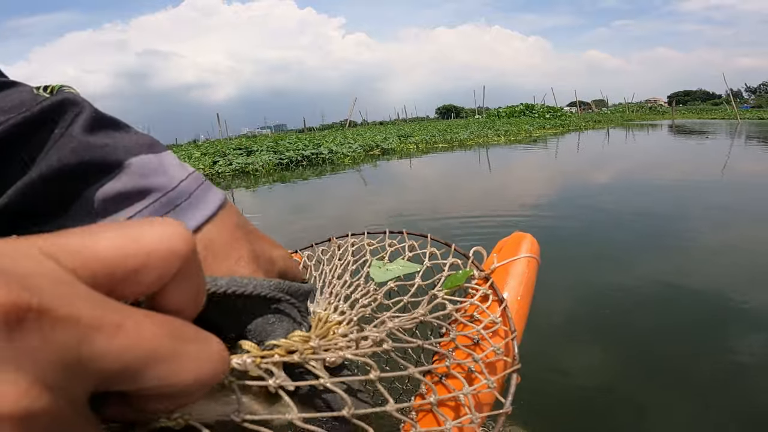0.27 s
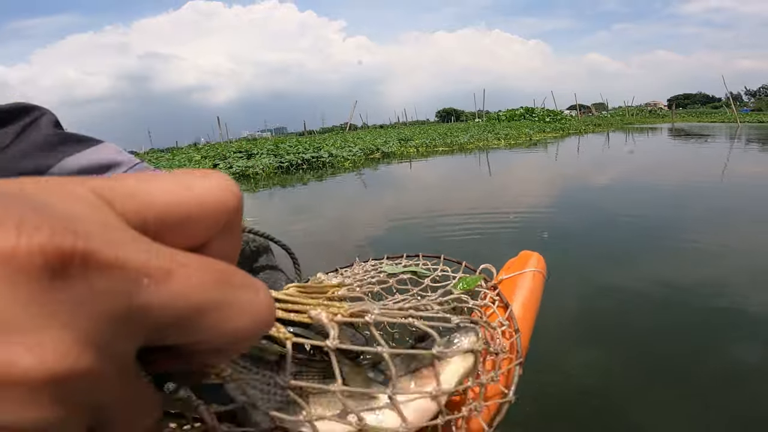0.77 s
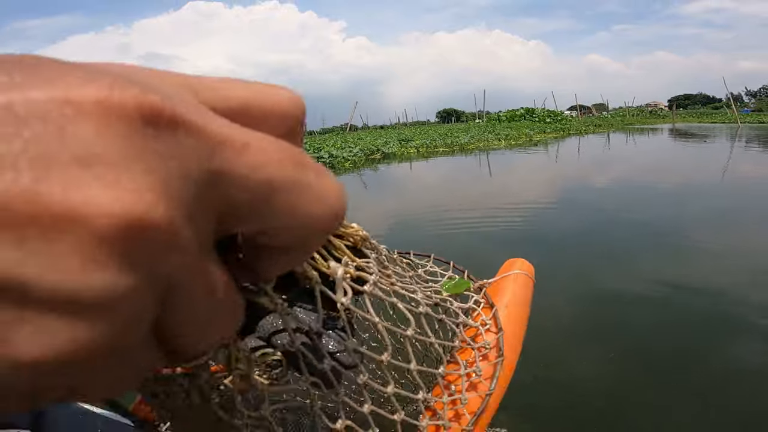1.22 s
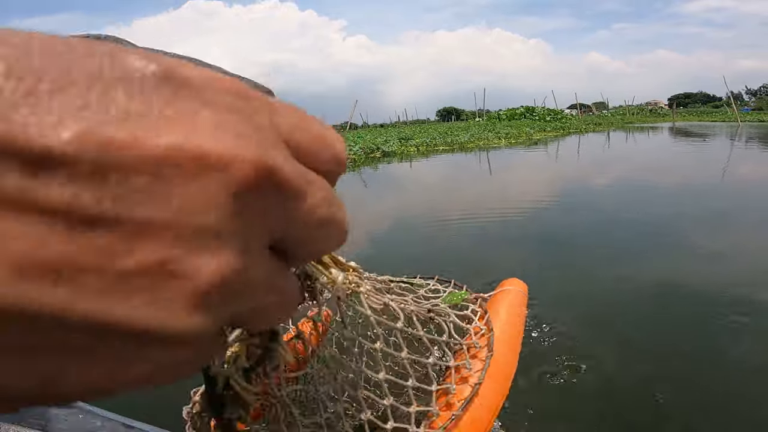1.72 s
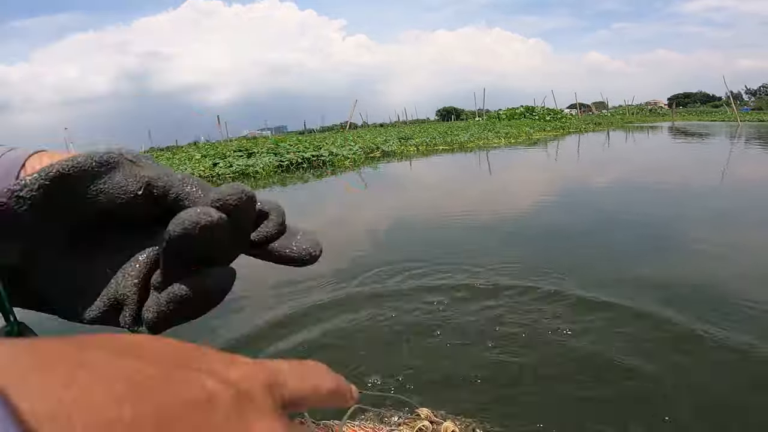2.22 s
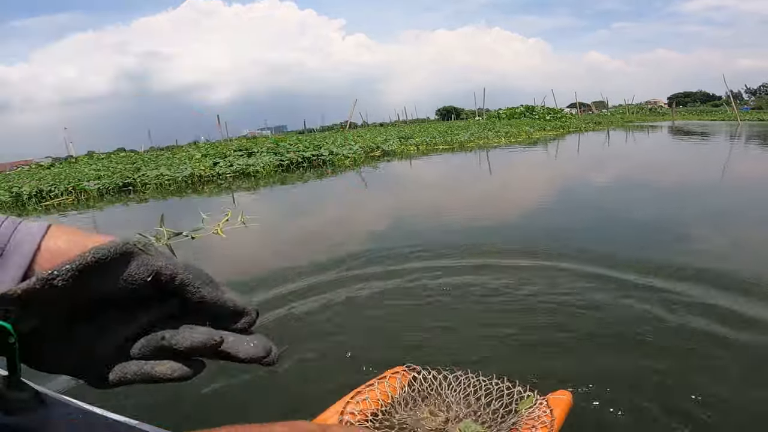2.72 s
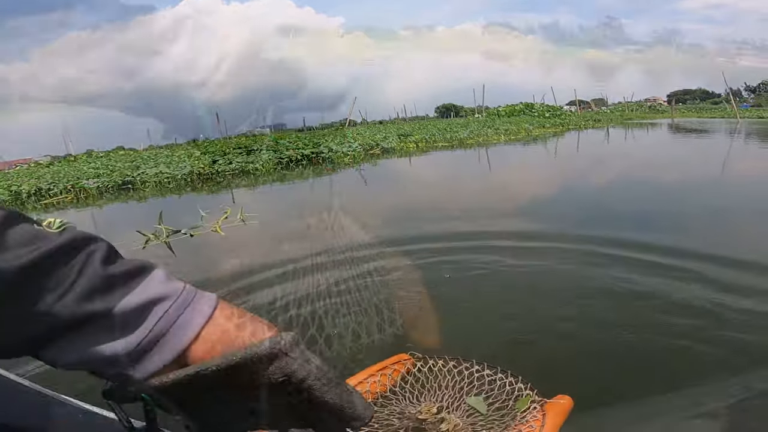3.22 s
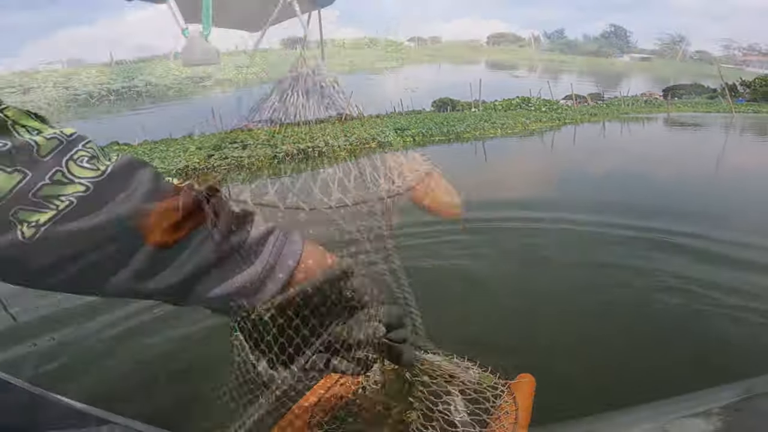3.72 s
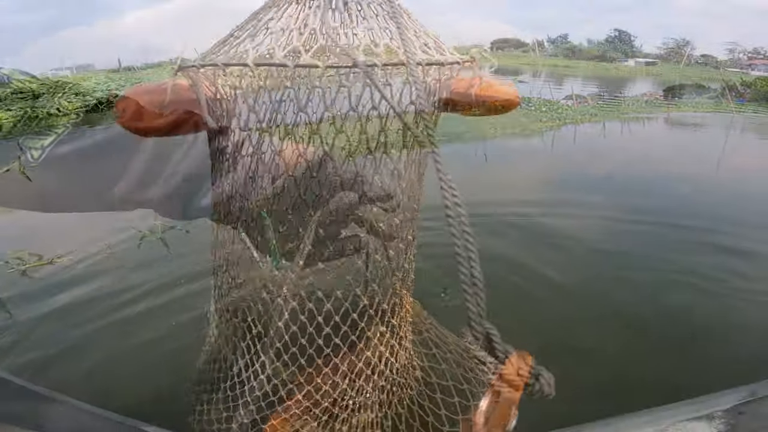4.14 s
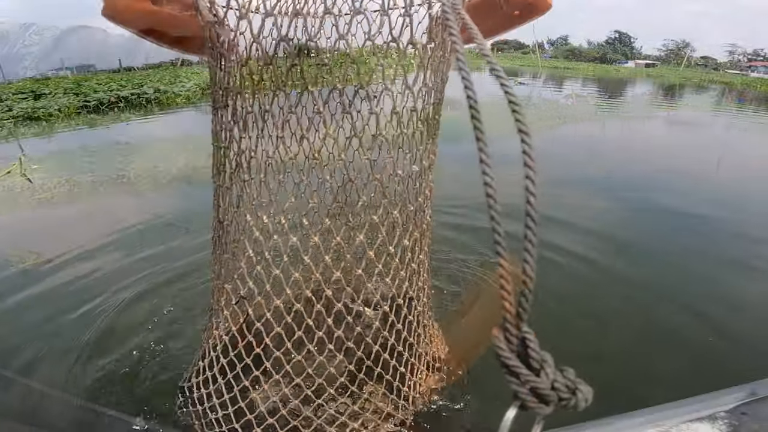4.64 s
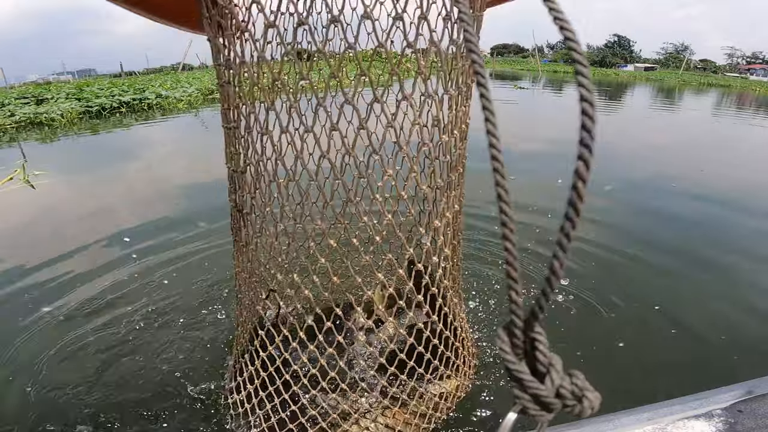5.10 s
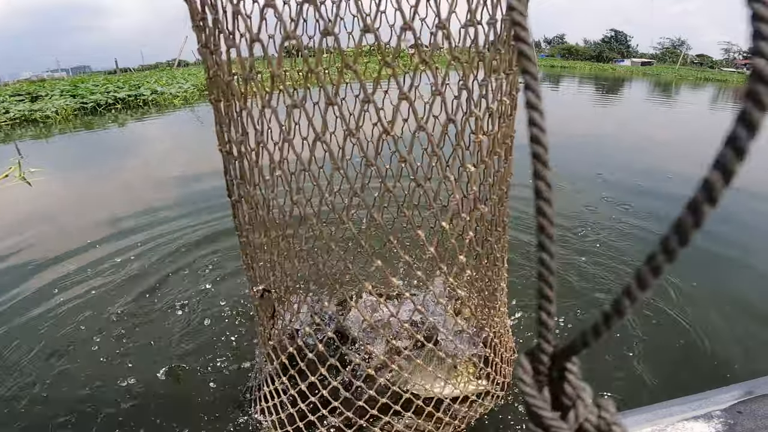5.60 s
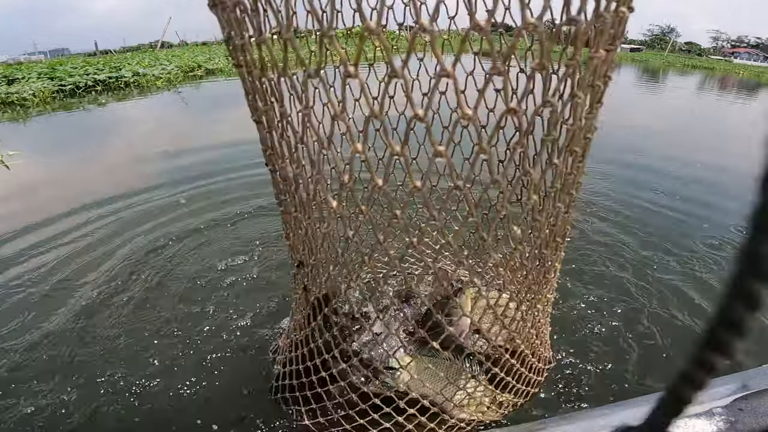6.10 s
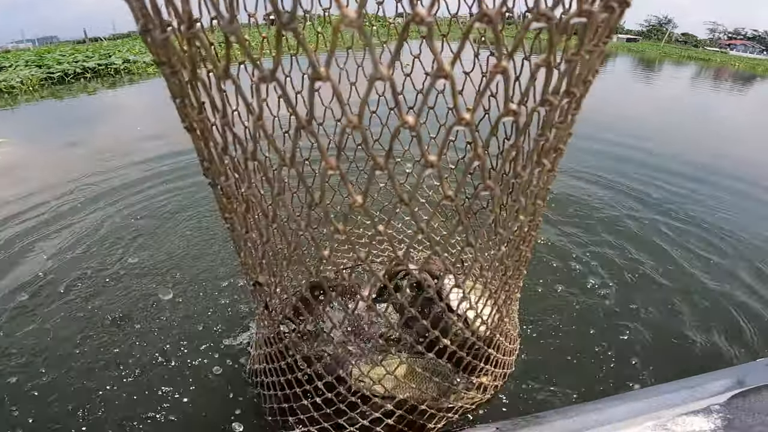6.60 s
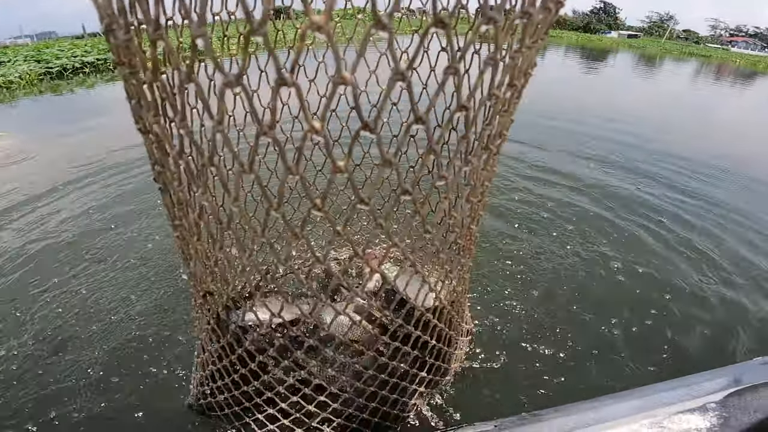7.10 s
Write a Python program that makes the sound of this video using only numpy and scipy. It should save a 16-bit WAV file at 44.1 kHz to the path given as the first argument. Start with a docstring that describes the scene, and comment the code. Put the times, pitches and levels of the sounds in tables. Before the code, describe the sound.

Wind buffets a close stereo microphone on a lake while someone handles a wet keep-net: cord rubs and snaps, hollow floats knock and drops plop. A steady, faraway engine hum joins in, and a small metal clip ticks a few times. Then water pours from the raised net and the fish in it splash and gurgle in repeated bursts, louder than everything before.

```python
"""On a small boat, close to a mesh keep-net, with a stereo microphone whose two ports sit side by side.
Wet cord rustles and snaps in the hands, floats knock, a metal clip ticks and drops plop.
Then the net is lifted and fish thrash in it: water splashes in surges of bubbles and fizz.
A breeze rumbles on the microphone; a low drone, as of a distant engine, sets in and settles in pitch."""
import sys
import numpy as np
from scipy import signal
from scipy.fft import rfft, irfft, next_fast_len
from scipy.io import wavfile
from scipy.ndimage import map_coordinates

SR = 44100
rng = np.random.default_rng(int(sys.argv[2]) if len(sys.argv) > 2 else 0)


def store_wav(level_fs):
    """Save 16-bit WAV to argv[1]."""
    pcm = np.round(np.clip(np.atleast_2d(level_fs), -1, 1) * 32767)
    wavfile.write(sys.argv[1], SR, pcm.T.astype(np.int16))


N = 324395

# spectrum of the deepest wind rumble: f/Hz, level/dB
RUMBLE_SPECTRUM = [(18, -8), (28, -1.5), (80, -3), (140, -13), (200, -120)]
# spectrum of wet cord rubbing: f/Hz, level/dB
CORD_SPECTRUM = [(300, -37.5), (600, 0), (1000, -14.5), (1700, -13.5), (3000, -12), (4700, -13),
                 (7400, -16), (10000, -31.5), (12500, -28.5), (15600, -38)]
# spectrum of thrown spray: f/Hz, level/dB
SPRAY_SPECTRUM = [(290, -33), (500, -10), (759, -7.5), (815, -12), (1100, 10), (1960, -6.5), (4200, -16.5),
                  (6470, -18), (10100, -33.5), (12400, -34.5), (15600, -52)]
GRIP_DB_PER_S, SLACK_DB_PER_S = 506, 402.5  # a stroke over the mesh swells and dies


def amp(db):
    """Gain of a level in dB."""
    return 10 ** (np.asarray(db) / 20)


def unit(x):
    """x at rms 1."""
    return x / np.sqrt(np.mean(x ** 2) + 1e-20)


def along(points, hz):
    """Value at hz between (Hz, value) points on a log axis."""
    f, v = np.transpose(points)
    return np.interp(np.log(hz + 1), np.log(f + 1), v)


def curves(rows):
    """One value per sample for each column after the time."""
    s, *cols = np.transpose(rows)
    return [np.interp(np.arange(N) / SR, s, c) for c in cols]


def wobble(rate):
    """A smooth random curve, rate knots a second."""
    return map_coordinates(rng.standard_normal(int(N * rate / SR) + 4), [np.arange(N) * rate / SR])


def held(start, hold, db, rise, fall):
    """Level in dB of a sound that swells at rise dB/s, holds from start, and dies at fall dB/s."""
    t = np.arange(N) / SR
    return db - rise * np.maximum(start - t, 0) - fall * np.maximum(t - start - hold, 0)


def together(levels_db):
    """Level in dB of sounds whose powers add."""
    return 10 * np.log10(sum(amp(2 * db) for db in levels_db) + 1e-14)


def filtered(x, response):
    """x through a frequency response."""
    m = next_fast_len(N + 8192)
    return irfft(rfft(x, m) * response(np.fft.rfftfreq(m, 1 / SR)), m)[..., :N]


def noise(spectrum, spiky_db=0, rate=300):
    """Coloured noise of rms 1; spiky_db clumps it into grains, rate a second."""
    white = rng.standard_normal(N) * amp(spiky_db * wobble(rate))
    return unit(filtered(white, lambda hz: amp(along(spectrum, hz))))


def split(x, hz, low_db, high_db):
    """The parts of x below and above hz, each at its own level."""
    low = filtered(x, lambda f: 1 / (1 + (f / hz) ** 4))
    return amp(low_db) * unit(low) + amp(high_db) * unit(x - low)


def bubbles(s, db, hz, cycles, rise, size=SR // 20):
    """Damped sines at times s; with rise > 0 the pitch climbs as the bubble nears the surface."""
    turns = hz[:, None] * (np.arange(size) / SR)
    age = turns / cycles[:, None]
    shape = (1 - np.exp(-turns)) * np.exp(-3 * age)
    wave = amp(db)[:, None] * shape * np.sin(2 * np.pi * turns * (1 + rise * np.minimum(age, 2) / 2))
    at = np.round(s * SR).astype(int)[:, None] + np.arange(size)
    return np.bincount(at.ravel(), wave.ravel(), N + SR)[:N]


def drone():
    """Far off, an engine's nearly pure firing tone and weak octave waver on their long path."""
    onset_s, attack_s = 2.845, 0.0073
    start_hz, rest_hz, settle_s = 94.95, 91.5, 0.792
    start_db, rest_db, ease_s = -23, -30, 1
    age = np.maximum(np.arange(N) / SR - onset_s, 0)
    hz = rest_hz + (start_hz - rest_hz) * np.exp(-age / settle_s)
    db = rest_db + (start_db - rest_db) * np.exp(-age / ease_s)
    phase = 2 * np.pi * np.cumsum(hz) / SR
    firing = amp(0.52 * wobble(4.9)) * np.sin(phase)
    octave = amp(-16 + 3 * wobble(5)) * np.sin(2 * phase)
    return np.sqrt(2) * amp(db) * (firing + octave) * np.minimum(age / attack_s, 1)


def breeze():
    """Turbulence buffets the microphone ports; a far roar swells with the same gusts."""
    # wind on the microphone: t/s, gust level/dB, rumble level/dB
    gusts = [(0.0, -24.5, -27), (0.5, -27, -35), (1.1, -23.5, -28), (1.43, -31, -39), (1.75, -32, -46),
             (2.2, -27.5, -39), (2.55, -39, -42.5), (3.05, -34, -26), (3.5, -31, -36), (3.9, -37.5, -35.5),
             (4.6, -38, -35), (7.36, -41, -34)]
    # spectrum of the buffeting: f/Hz, level/dB
    boom_spectrum = [(41, -13.5), (70, -6), (103, -5), (125, -1), (146, 0), (257, -8), (450, -24),
                     (580, -43.5), (990, -120)]
    # spectrum of the distant wind: f/Hz, level/dB
    roar_spectrum = [(200, -29.5), (330, 2), (650, 4), (800, -10.5), (1100, -22), (9000, -50.5),
                     (12000, -72.5)]
    gust_db, rumble_db = curves(gusts)
    rumble = amp(rumble_db + 2.0 * wobble(4.1)) * noise(RUMBLE_SPECTRUM)
    boom = amp(gust_db + 2.07 * wobble(9.7)) * noise(boom_spectrum)
    roar_db = -47.5 + 0.94 * (gust_db - gust_db.mean()) + 2.2 * wobble(7.5)
    return rumble + boom + amp(roar_db) * noise(roar_spectrum)


def cord(wet, count=9000):
    """Wet cord under strain: hiss and tiny bursting water films, coloured by the mesh."""
    when, strength, pitch, life = rng.random((count, 4)).T
    film_db = -3 * np.log(strength + 0.012)
    films = bubbles(when * N / SR, film_db, 900 * 12 ** pitch, 3 + 9 * life, rise=0.39, size=SR // 100)
    hiss = amp(2.1 * wobble(700)) * rng.standard_normal(N)
    return filtered(unit(hiss) + wet * unit(films), lambda hz: amp(along(CORD_SPECTRUM, hz)))


def trickle(count=45):
    """Water drains from a float as it tips, in small bubbles that thin out."""
    when, strength, life = rng.random((count, 3)).T
    hz = 2300 * np.exp(0.36 * rng.standard_normal(count))
    db = -35 - 3 * np.log(strength + 0.0042)
    return bubbles(1.53 + 0.36 * when ** 2, db, hz, 3 + 10 * life, rise=0.29)


def rustle():
    """Fibres slip over skin and knots in clumps, above the cord's faint hiss and a brief trickle."""
    # hands sliding over wet cord: t/s, hold/s, level/dB, treble re level/dB
    strokes = [(0.032, 0.2, -51, -8.5), (0.343, 0.17, -61.5, 0), (0.7, 0.063, -57, -5),
               (0.716, 0.0042, -30.5, 0.5), (0.881, 0.045, -47.5, 0), (0.972, 0.073, -44.5, -8.5),
               (1.111, 0.09, -51, -7), (1.342, 0.31, -47, -11.5), (1.639, 0.35, -50, -11.5),
               (2.097, 0.24, -51.5, -11.5), (2.596, 0.094, -63, -6.5), (2.784, 0.096, -51.5, -14.5),
               (2.992, 0.015, -47, -8.5), (3.131, 0.1, -43, -22), (3.312, 0.062, -51, -10),
               (3.387, 0.071, -50, -7), (3.511, 0.065, -46, -15.5), (3.641, 0.15, -62.5, -2.5),
               (3.891, 0.43, -65.5, -3), (4.065, 0.013, -56.5, -2.5), (4.332, 0.05, -44.5, -14),
               (4.434, 0.65, -65, -1)]
    slips_db = 2.5 * wobble(40) + 2.8 * wobble(200)
    idle_db = held(0, 4.9, -77, GRIP_DB_PER_S, SLACK_DB_PER_S)  # until the hands let go
    lows, highs = [idle_db], [idle_db]
    for s, hold, db, treble_db in strokes:
        stroke_db = held(s, hold, db, GRIP_DB_PER_S, SLACK_DB_PER_S) + slips_db
        lows.append(stroke_db)
        highs.append(stroke_db + treble_db)
    return trickle() + split(cord(wet=0.47), 2050, together(lows), together(highs))


def snaps():
    """Each crunch swells to a sharp crack and falls away; the hollow float answers with a dull thump."""
    # cord crunches and float knocks: t/s, relative level/dB, treble offset/dB, thump offset/dB
    crunches = [(0.1169, -20, -17.5, 7), (0.404, -24.5, -5.5, -11), (0.531, -42.5, -2.5, 9),
                (0.773, -42, 5, 2), (0.886, -26.5, -7.5, 0), (0.899, -27.5, -6.5, 14),
                (1.026, -24, 1, 11.5), (1.053, -31.5, -23, 13), (1.149, -23.5, -12.5, 11),
                (1.1701, -30.5, -2, 5), (1.22, -25.5, -21, 13.5), (1.304, -37.5, -15.5, 23),
                (1.3527, -11.5, -15.5, -6), (1.368, -20, -24.5, 11), (1.456, -17.5, -22, -5),
                (1.5897, -25.5, -11, -18), (1.735, -29.5, -19.5, 3), (1.915, -51, -22, 32),
                (2.2201, -23, -19.5, -7), (2.2782, -25, -13, 15), (2.6803, -41.5, -36, 22),
                (2.707, -44, -35, 19), (2.8571, -21.5, -29, 3), (2.876, -32, -16.5, -6),
                (2.9762, -34.5, -13, 13), (3.334, -31, -29, 3.5), (4.191, -44.5, -17, 20.5),
                (4.346, -25, -4.5, 1)]
    t, reach = np.arange(N) / SR, SR // 10
    strain, clean = cord(wet=0.63), noise(CORD_SPECTRUM)
    body, crack_body = [split(x, 2880, 0, -99) for x in (strain, clean)]
    edge, crack_edge = [split(x, 3100, -99, 0) for x in (strain, clean)]
    low, high, blows = np.zeros((3, N))
    for s, db, treble_db, thump_db in crunches:
        near = slice(max(round(s * SR) - reach, 0), round(s * SR) + reach)
        dt = t[near] - s
        stretch = amp(0.1 * (db + 28))  # a louder crunch lasts longer
        crunch = 0.22 / np.cosh(dt / np.where(dt < 0, 0.0063, 0.0081) / stretch)
        crack = 1.26 * np.exp(-np.abs(dt) / np.where(dt < 0, 0.0002, 0.0025))
        low[near] += amp(db) * (crunch * body[near] + crack * crack_body[near])
        high[near] += amp(db + treble_db) * (crunch * edge[near] + crack * crack_edge[near])
        blows[near] += amp(db + thump_db - 4.5) * np.exp(-np.abs(dt) / np.where(dt < 0, 0.0015, 0.012))
    s, db, _, thump_db = np.transpose(crunches)
    thump_hz = 240 * np.exp(0.32 * rng.standard_normal(len(s)))
    thumps = bubbles(s, db + thump_db + 8, thump_hz, np.full(len(s), 3.5), rise=-0.16)
    hollow = noise([(100, -20), (170, -1), (650, -9), (1000, -32), (2000, -63.5)])
    # wet cord is soft: the body of a crunch and the thump lose their treble
    dull = filtered(low + blows * hollow + thumps, lambda hz: 1 / (1 + (hz / 4500) ** 4))
    return dull + filtered(high, lambda hz: 1 / (1 + (hz / 15000) ** 4))


def mesh_ring(x, count=5):
    """x with the ring of floats and mesh; the resonances shift as one random grip blends into another."""
    # hollow resonances of floats and taut mesh: f/Hz, width/Hz, relative level/dB
    resonances = [(1100, 110, 3), (1700, 150, 6), (3890, 200, 4), (4870, 180, 4)]
    hz, width, db = np.transpose(resonances)[:, :, None]
    grips = amp([9 * wobble(7) for _ in range(count)])
    shifted_hz = hz * np.exp(0.12 * rng.standard_normal((count, len(resonances), 1)))
    rung = 0
    for grip, peak_hz in zip(grips / grips.sum(0), shifted_hz):
        def response(f):
            damping = 1j * f * width
            return 1 + (amp(db) * damping / (peak_hz ** 2 - f * f + damping)).sum(0)
        rung = rung + filtered(grip * x, response)
    return 0.89 * rung


def scrape():
    """One short, bright drag across the mesh hisses in a single resonance."""
    centre_hz, half_width_hz = 5100, 1100
    band = filtered(rng.standard_normal(N), lambda hz: 1 / (1 + ((hz - centre_hz) / half_width_hz) ** 2))
    db = held(3.385, 0.055, -50, GRIP_DB_PER_S, SLACK_DB_PER_S) + 2.6 * wobble(120)
    return amp(db) * unit(band)


def clip_ticks():
    """A small metal clip knocks on the rope: each dry click leaves it ringing faintly."""
    # knocks, some damped by the rope: t/s, click level/dB, ring offset/dB
    knocks = [(3.6424, -35.5, -24), (4.239, -42, -9), (4.368, -39, -14), (4.4466, -18, -14.5),
              (4.5178, -39, 3), (4.573, -43.5, 5), (4.622, -41, -4), (4.737, -43, 5.5)]
    modes = [(3900, -17, .05), (5050, -17, .11), (6900, -18, .012)]
    clicks, rings = np.zeros((2, N + SR))
    t = np.arange(SR // 5) / SR
    for s, db, ring_db in knocks:
        ring = sum(amp(mode_db + rng.normal(0, 3) - 60 * t / t60) * np.sin(2 * np.pi * hz * t)
                   for hz, mode_db, t60 in modes)
        rings[round(s * SR):][:len(t)] += amp(db + ring_db) * ring
        clicks[round(s * SR):][:len(t)] += amp(db - 60 * t / 0.025) * rng.standard_normal(len(t))
    clicks = filtered(clicks[:N], lambda hz: 1 / (1 + (3500 / (hz + 1)) ** 4) / (1 + (hz / 8400) ** 8))
    return amp(5.0 * wobble(90)) * rings[:N] + clicks


def float_clank(knock_s=4.345):
    # modes of the float: f/Hz, level/dB, t60/s
    modes = [(493, 2.5, 0.11), (1070, -7, 0.11), (1640, -1, 0.068), (3030, -13.5, 0.1)]
    t = np.maximum(np.arange(N) / SR - knock_s, 0)
    ring = sum(amp(db - 60 * t / t60) * np.sin(2 * np.pi * hz * t) for hz, db, t60 in modes)
    return amp(-26.5 + 3 * wobble(150)) * ring


def plops():
    """A short splat of spray, then a trapped bubble rings; the early drips are shallow and chirp upward."""
    # slaps that each trap one large bubble: t/s, level/dB, nominal f/Hz
    slaps = [(1.522, -18.5, 850), (1.557, -21.5, 1240), (1.572, -22.5, 1020), (1.822, -20.5, 1170),
             (4.452, -25.5, 1240), (4.472, -33.5, 1200), (4.767, -29, 680), (4.803, -27, 2540),
             (4.807, -30, 1480), (4.835, -21.5, 1200), (4.856, -25.5, 1150), (4.894, -24, 1250),
             (4.93, -6.5, 1155), (4.965, -8, 900), (5.028, -19, 1130), (5.048, -10.5, 1175),
             (5.231, -6.5, 1010), (5.263, -9, 597), (5.279, -11.5, 810), (5.327, -12.5, 2720),
             (5.441, -5.5, 1210), (5.47, -12.5, 594), (5.552, -18, 904), (5.619, -11.5, 3040),
             (5.904, -15.5, 1420), (6.133, -19, 1810), (6.165, -11.5, 1040), (6.358, -14.5, 1110),
             (6.535, -12.5, 1600), (6.721, -10, 494), (6.754, -11, 735), (6.798, -11.5, 925),
             (7.06, -16.5, 2170), (7.076, -15.5, 1210)]
    s, db, hz = np.transpose(slaps)
    hits = np.bincount(np.round(s * SR).astype(int), amp(db - 11), N)[:N]
    t = np.arange(SR // 20) / SR
    splat_shape = (1 - np.exp(-t / 0.00065)) * amp(-60 * t / 0.037)
    splats = signal.fftconvolve(hits, splat_shape)[:N] * noise(SPRAY_SPECTRUM)
    early, late = s < 1.7, s >= 1.7
    drips = bubbles(s[early], db[early], 0.89 * hz[early], hz[early] / 60, rise=0.76)
    return splats + drips + bubbles(s[late], db[late], hz[late], 4 + hz[late] / 160, rise=0.13)


def pops():
    """Bubbles that burst at once ring for only a few cycles."""
    # sharp slaps of water: t/s, relative level/dB, f/Hz
    slaps = [(5.018, -7, 4870), (5.674, -9.5, 2360), (5.981, -14.5, 517), (6.063, -11, 3960),
             (6.372, -12, 1140), (7.2486, -8, 1380)]
    s, db, hz = np.transpose(slaps)
    return bubbles(s, db + 9, hz, np.full(len(s), 4.5), rise=0.087)


def splash():
    """Close by, the lifted net streams; each surge of fish throws spray and drags down bubble swarms."""
    # fish thrashing: t/s, hold/s, relative gurgle level/dB, slosh offset/dB, spray offset/dB
    bouts = [(4.932, 0.08, -23, -5, -2.5), (5.048, 0.0071, -26, -18, 0.5), (5.227, 0.14, -24, -5, -3.5),
             (5.406, 0.059, -21, 0, -2.5), (5.551, 0.026, -21, -13, -4.5), (5.61, 0.025, -21.5, -20, 0.5),
             (5.672, 0.046, -25.5, -16, 1), (5.876, 0.023, -27, -8, 4.5), (5.955, 0.097, -26.5, -9, 0.5),
             (6.144, 0.12, -25, -8, -2.5), (6.307, 0.011, -29, -16, 1), (6.344, 0.11, -24, -3, -1),
             (6.49, .06, -27.5, -14, -3.5), (6.727, 0.037, -22, -6.5, -2), (6.775, 0.031, -21, 1.5, -1),
             (7.077, 0.07, -27, -7.5, 5), (7.233, 0.004, -28.5, -10, 3), (7.322, .005, -32, -10, 5.5)]
    lift_s, swarm_s = 4.93, 4.75
    pour_db = held(lift_s, N / SR, -33.5, rise=263, fall=0)
    gurgles, sloshes, sprays = [pour_db], [pour_db - 24], [pour_db]
    for s, hold, db, slosh_offset, spray_offset in bouts:
        bout_db = held(s, hold, db, rise=500, fall=250)
        gurgles.append(bout_db)
        sloshes.append(bout_db + slosh_offset)
        sprays.append(bout_db + spray_offset)
    gurgle_db, slosh_db, spray_db = together(gurgles), together(sloshes), together(sprays)
    slaps_db = 3.2 * wobble(70)
    spray = noise(SPRAY_SPECTRUM, spiky_db=0.5, rate=350)
    fizz_db = spray_db - 11.5 + 0.92 * slaps_db + 2.74 * wobble(150)
    water = split(spray, 2390, gurgle_db - 14 + slaps_db, fizz_db)
    # bubble swarms: count, level/dB, middle f/Hz, log pitch scatter, life/cycles
    swarms = [(650, gurgle_db - 6, 1050, 0.3116, 12),
              (1100, slosh_db - 5.5, 516, 0.3, 2.7),
              (2000, spray_db - 8, 2705, 0.451, 8.4)]
    for count, level_db, mid_hz, scatter, cycles in swarms:
        when, strength, life = rng.random((count, 3)).T
        hz = mid_hz * np.exp(scatter * rng.standard_normal(count))
        s = swarm_s + (N / SR - swarm_s) * when
        swarm = bubbles(s, -3.1 * np.log(strength + 0.0096), hz, cycles * (0.5 + life), rise=0.3)
        water = water + amp(level_db + 0.45 * slaps_db) * swarm / np.std(swarm[int(swarm_s * SR):])
    return water


def microphone(x):
    """Two close ports hear much alike; scattered paths part the treble, and briefly the lower bands."""
    # what differs between the ports: f/Hz, side re mid/dB
    side_spectrum = [(60, -29), (150, -23), (380, -15.5), (950, -26), (2380, -13), (5980, -6), (15000, 4.5)]
    wide_s, narrow_s, wide_db = 5.72, 6.38, 3  # the image opens while the net hangs close
    width_db = held(wide_s, narrow_s - wide_s, wide_db, rise=27, fall=59)
    hz, t, spectra = signal.stft(x, SR, nperseg=512)
    frame_db = np.interp(t * SR, np.arange(N), np.maximum(width_db, -40))
    side_db = along(side_spectrum, hz)[:, None] + frame_db / (1 + (hz[:, None] / 5000) ** 2)
    scattered = spectra * amp(side_db) * np.exp(2j * np.pi * rng.random(spectra.shape))
    diffuse = 0.9 * signal.istft(scattered, SR, nperseg=512)[1][:N]
    wind = amp(width_db - 42 + 5 * wobble(8)) * noise(RUMBLE_SPECTRUM)  # differs from port to port
    treble = filtered(x, lambda f: 1 / (1 + (1500 / (f + 1)) ** 2))
    lean = 0.054 * amp(width_db - wide_db) * treble  # the close net sits a little to the left
    side = diffuse + wind + lean
    return np.array([x + side, x - side])


def scene():
    """Wind, net and water reach the same pair of ports; the distant drone sits in the centre."""
    wind = breeze()
    net = mesh_ring(rustle() + snaps()) + scrape() + clip_ticks() + float_clank()
    water = splash() + plops() + pops()
    return microphone(wind + net + water) + drone()


def record(dry):
    """The input rounds off the highest peaks and keeps nothing above its band limit."""
    ceiling, top_hz = 0.7, 15750
    rounded = dry / (1 + np.abs(dry / ceiling) ** 4) ** 0.25
    return filtered(rounded, lambda hz: hz < top_hz)


dry = scene()
out = record(dry)
store_wav(out)
```